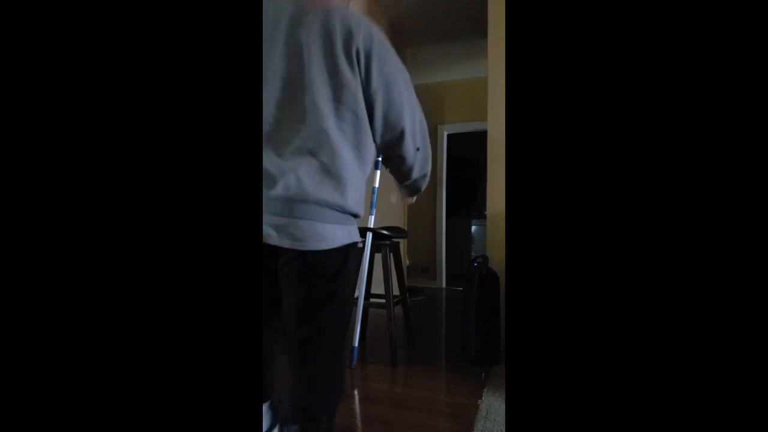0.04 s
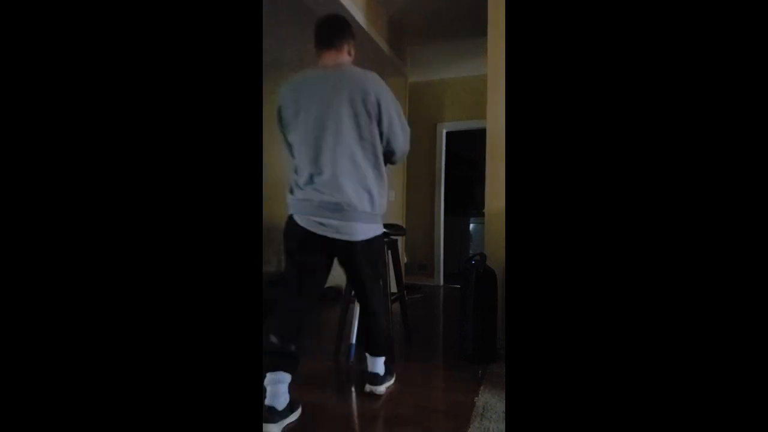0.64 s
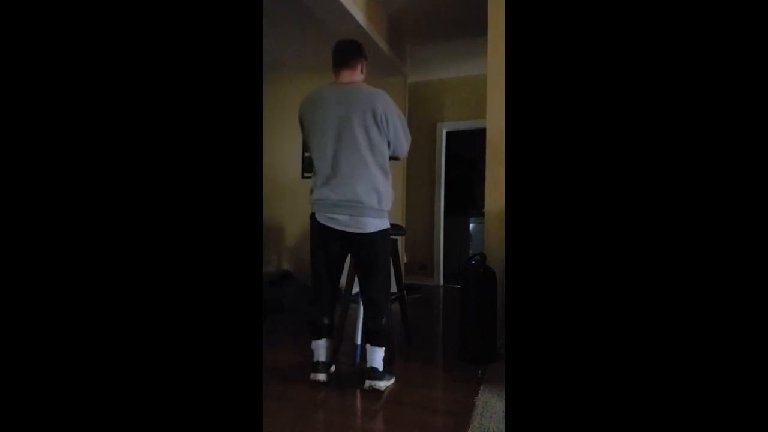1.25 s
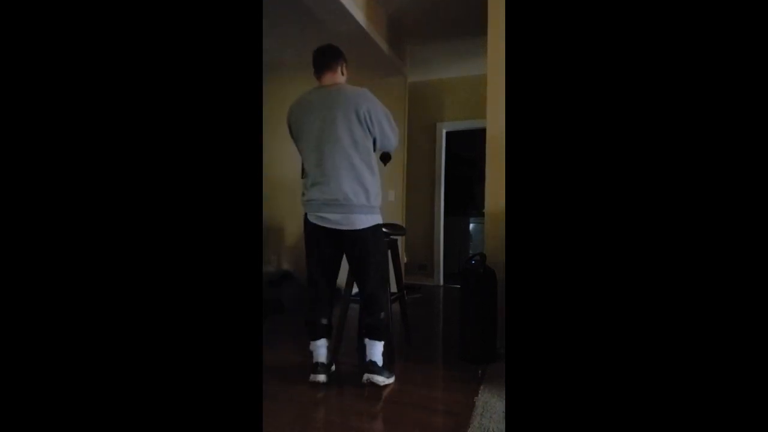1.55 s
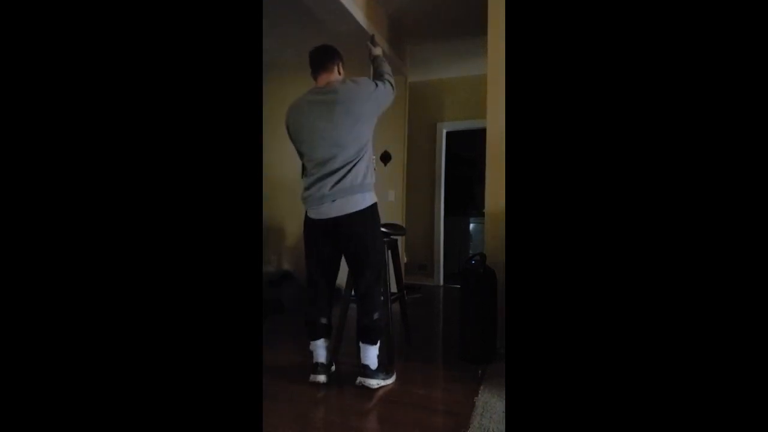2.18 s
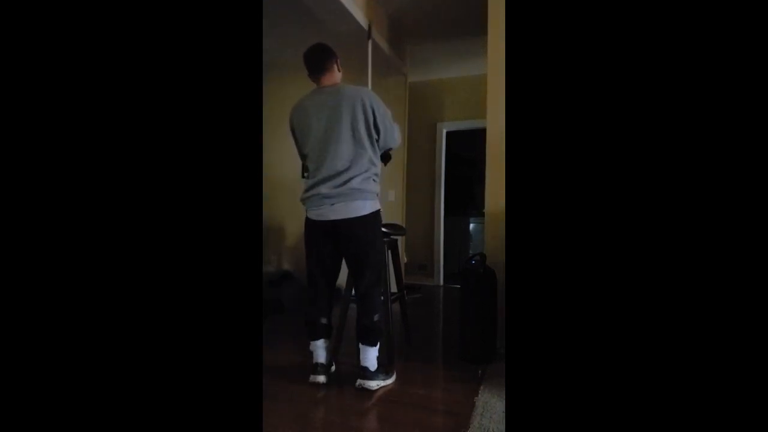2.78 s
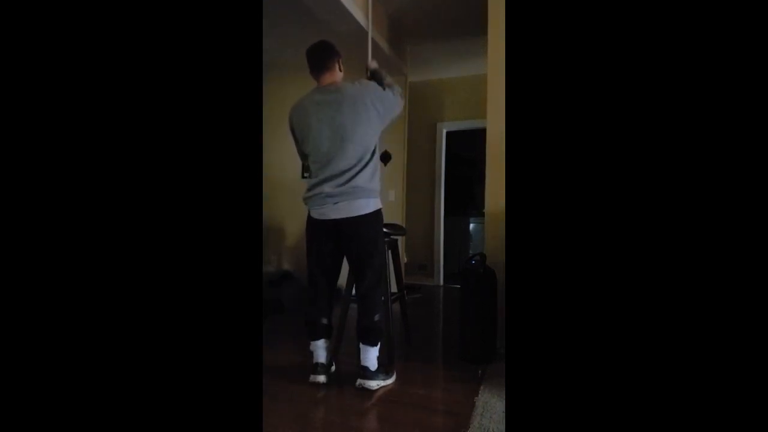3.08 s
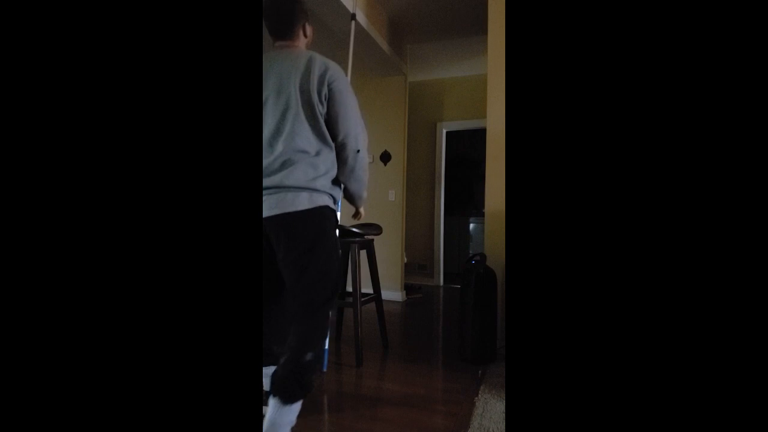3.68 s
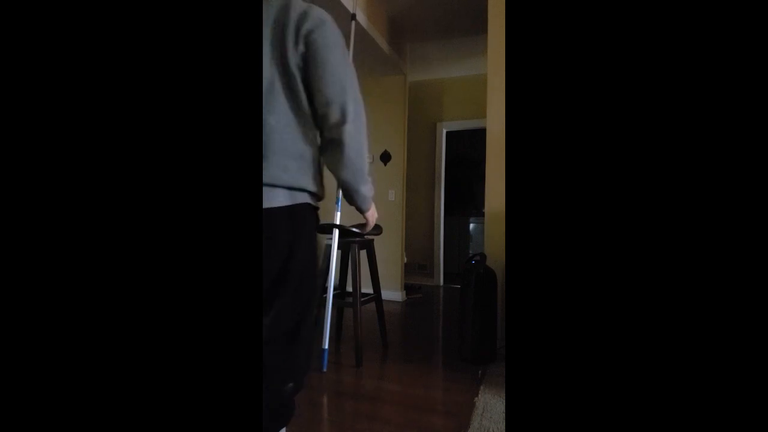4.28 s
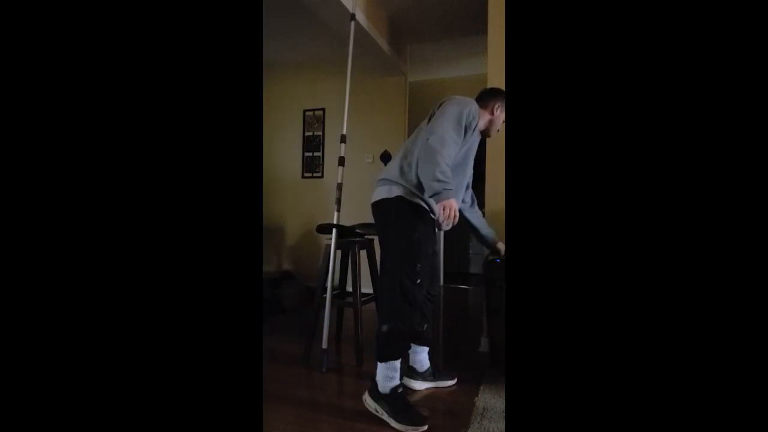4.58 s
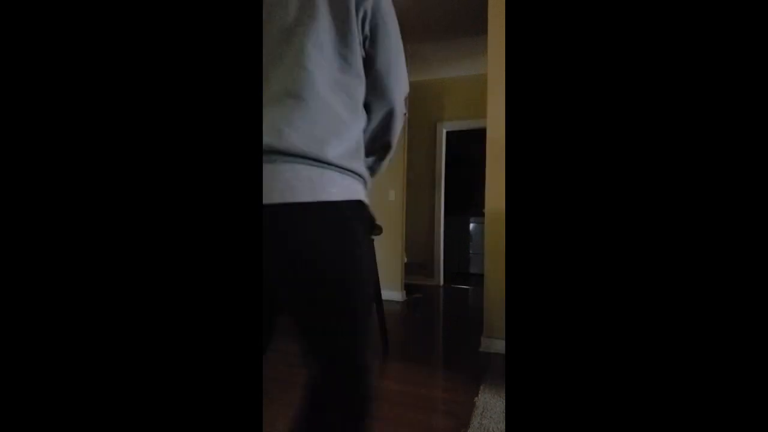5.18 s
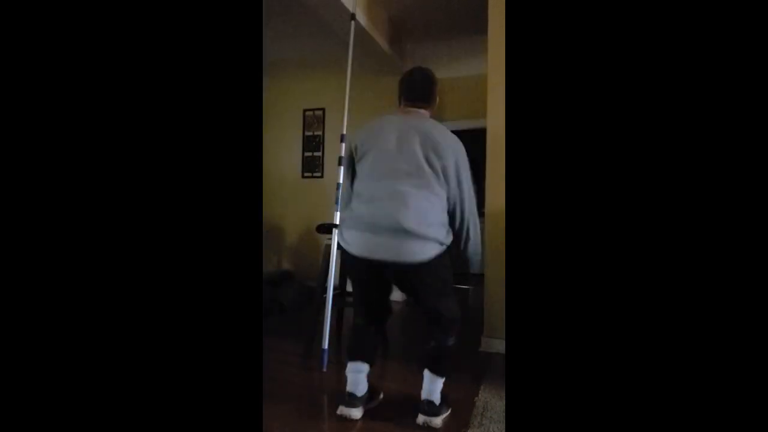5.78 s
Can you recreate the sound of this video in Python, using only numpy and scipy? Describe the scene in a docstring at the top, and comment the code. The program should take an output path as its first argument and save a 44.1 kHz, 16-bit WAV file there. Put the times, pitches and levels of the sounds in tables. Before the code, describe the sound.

Soft footsteps and rustling clothes lead into four wooden thumps as a metal pole is pushed into place against a stool, the last one weaker. The room resonates low after each blow, and the pole ticks, scrapes and squeaks faintly. Near the end, heavier steps thud and scuff on the floorboards as someone jumps. A microphone in the room picks up a low hum of air and a faint, thin hiss that comes and goes.

```python
"""Air hums in a quiet room; a thin high hiss comes and goes, clothes swish and soft steps thud
on the hardwood floor. A long metal pole is stood against a wooden stool and knocked home four
times: each blow thumps the wood and leaves the room ringing with low, lasting resonances. In
between the pole ticks, squeaks and scrapes, tiny slips ringing the tube. Then steps, rustling
clothes and scuffing shoes build to a jump, while the rush of air swells a little."""
import sys
import numpy as np
from scipy import signal
from scipy.fft import rfft, irfft, next_fast_len
from scipy.io import wavfile
from scipy.ndimage import uniform_filter1d

SR = 44100
rng = np.random.default_rng(int(sys.argv[2]) if len(sys.argv) > 2 else 0)


def generate_wav(signal):
    """Clip the signal to [-1, 1] and save it as 16-bit WAV at the path in sys.argv[1]."""
    frames = np.transpose(np.atleast_2d(signal))
    scaled = np.clip(frames, -1, 1) * 32767
    pcm = np.round(scaled).astype(np.int16)
    wavfile.write(sys.argv[1], SR, pcm)


N = 266667
TIME = np.arange(N) / SR

# colour of the low rush of air: f/Hz, level/dB
AIR_COLOUR = [(25, -28), (60, -3), (120, -3.5), (200, -4), (260, -3.5), (380, 1.5), (600, -7.5), (830, -3),
              (1050, -8.5), (1400, -6), (1700, -16)]
# colour of its faint treble: f/Hz, level/dB
AIR_TREBLE = [(1700, 7), (1950, -18), (3000, -14.5), (5000, -27.5), (7400, -12), (8600, -27), (16000, -21)]
# the rush swells towards the end: t/s, level/dB
AIR_SWELL = [(0, -61), (4.3, -60.5), (5.2, -58.5), (6.05, -56.5)]
# narrow hums in the air: f/Hz, width/Hz, level/dB
AIR_HUMS = [(235.7, 2.7, -64), (311, 28, -83), (1349, 19, -73.5), (3896, 65, -88.5), (6780, 110, -85.5)]
# spans of thin high hiss: t/s, length/s, level/dB
HISS_SPANS = [(0, 0.41, -73), (1.65, .64, -72), (2.815, 0.56, -71), (3.545, 0.82, -83)]
# colour of that hiss: f/Hz, level/dB
HISS_COLOUR = [(1800, -5), (2600, -8), (4500, -3.5), (7600, -1), (8800, -8.5), (11000, -9.5), (12200, -2),
               (13500, -9), (16000, -19)]
# clothes swish as an arm or the body swings: peak t/s, level/dB, half length/s
CLOTH_SWISHES = [(0, -67, 0.072), (0.867, -66, 0.19), (1.487, -67.5, 0.21), (2.3, -63, 0.062),
                 (3.973, -67.5, 0.079), (4.443, -66.5, 0.062), (4.804, -80, 0.089), (5.545, -59.5, 0.24),
                 (5.998, -49.5, 0.18)]
# soles scuff the floor: t/s, level/dB, length/s
SOLE_SCUFFS = [(.19, -59.5, .21), (.71, -65, 0.19), (1.155, -55, 0.067), (2.825, -52.5, 0.14),
               (5.31, -45.5, 0.086), (5.645, -62, 0.074), (5.84, -36.5, 0.036)]
# colour of rubbing cloth and soles: f/Hz, level/dB
RUB_COLOUR = [(300, 22.5), (800, 8), (1500, 15), (2100, 2), (3000, 4), (5000, -1.5), (7500, 0),
              (9500, -7.5), (12500, -4), (16000, -8)]
# clacks of pole, shoes and loose boards: t/s, level/dB, f/Hz
CLACK_HITS = [(0.249, -57, 1380), (.757, -54, 830), (4.422, -53, 885), (4.767, -53, 1110),
              (5.594, -48, 1470), (5.631, -34, 1440), (5.803, -45.5, 1260), (5.833, -38, 592),
              (5.835, -41, 1310), (5.849, -43.5, 1590), (6.039, -35, 1500)]
# footfalls: t/s, heel level/dB, ball level/dB, heel-to-ball roll/s, heel brightness/Hz
FOOTFALLS = [(.29, -49, -42, .075, 179), (0.759, -43.5, -49, .075, 230), (1.138, -40.5, -41, .067, 200),
             (2.875, -27.5, -24.5, .045, 108), (3.071, -50, -41.5, .14, 105), (5.245, -47, -30, .068, 151),
             (5.40, -37, -54, .09, 111), (5.63, -32.5, -38, .04, 166), (5.835, -28, -17.5, .033, 156)]
# modes of the floorboards under a foot: f/Hz, level/dB, t60/s
BOARD_MODES = [(57.8, -7.5, 0.19), (80.2, -6, 0.18), (119.3, -2, 0.049), (191.4, -1, 0.051),
               (271, 0.5, 0.04), (600, -58, 0.0062)]
# small sharp ticks and, near 5.65 s, a clack's two bright echoes: t/s, level/dB, f/Hz
TICK_HITS = [(0.817, -51, 11000), (0.921, -49, 10800), (5.63, -38, 5000), (5.6498, -37, 9400),
             (5.6542, -30.5, 7640), (5.835, -39, 2780)]
# the pole catches on the seat, then scrapes along it: t/s, clack level/dB, scrape level/dB, length/s
SEAT_SCRAPES = [(1.373, -49, -55, 0.14), (2.22, -50, -49.5, 0.083), (2.737, -54, -60.5, 0.094),
                (2.829, -44.5, -52, 0.032)]
# modes of the sliding tube: f/Hz, level/dB, t60/s
TUBE_MODES = [(650, 3, 0.024), (745, 0, 0.016), (954, 11.5, 0.01), (1476, 9, 0.016), (1670, -15, 0.011),
              (2336, -2.5, 0.015), (2630, -12, 0.023), (4740, 3, 0.00065)]
# four firm knocks of the pole and a few faint bumps: t/s, level/dB, brightness/Hz
POLE_KNOCKS = [(1.4035, -7.5, 930), (1.6825, -4.5, 2180), (2.186, -10.5, 3060), (2.737, -39.5, 1500),
               (2.8645, -21, 890), (3.628, -40.5, 700), (3.665, -39, 486), (4.424, -39.5, 700)]
# modes of the damped wood under a knock: f/Hz, level/dB, t60/s
WOOD_MODES = [(157, -11.5, 0.023), (249, 4, 0.017), (496, -19, 0.022), (913, -13, 0.0068),
              (1310, -18, 0.016), (2500, -20, 0.0021), (5260, -29, 0.00067), (7920, -6, 0.0015)]
# lasting resonances of the room, set off by a knock: f/Hz, level/dB, t60/s
ROOM_MODES = [(62.1, -22.5, 1), (91.3, -23, 0.86), (108, -40, 0.38), (149.3, -36.5, 0.93), (179, -23, 0.41),
              (191, -22, 0.61), (200, -45, 0.78), (237.4, -16, 0.49), (252.7, -15.5, 0.37),
              (262.7, -17, 0.58), (293.2, -12.5, 0.29), (308.5, -14.5, 0.41), (330.8, -21.5, 0.66),
              (338, -39, 0.46), (408, -30, 0.63), (441.5, -38.5, 0.75), (529, -26, 0.4), (597, -31.5, 0.46),
              (770, -50, 0.46), (824, -38.5, 0.66), (926, -62, 1), (1244, -40, 0.14), (1460, -42, 0.33),
              (1500, -45, 0.99)]
# brief squeaks of the pole: peak t/s, level/dB, half length/s, f/Hz, waver/Hz
POLE_SQUEAKS = [(1.59, -54, .03, 668, 8), (2.355, -50.5, .055, 680, 14), (3.005, -64, .035, 10500, 350)]
# early reflections: delay/s, gain
REFLECTIONS = [(.0108, .4), (.0198, .65), (.0225, .4)]
# decay of the room's tail: f/Hz, t60/s
TAIL_DECAY = [(60, 1.0), (250, 0.68), (700, 0.55), (1500, 0.6), (3000, 0.56), (8000, 0.41), (16000, 0.31)]
# colour of that tail: f/Hz, level/dB
TAIL_COLOUR = [(60, -3), (150, -1.5), (280, -0.5), (600, 8), (1400, 4.5), (3000, 13.5), (8000, 8.5),
               (16000, 0)]
# how alike left and right are in diffuse sound: f/Hz, correlation
STEREO_LIKENESS = [(60, 0.86), (300, 0.98), (600, 0.81), (1000, -0.069), (1500, -0.069), (3000, 0.026),
                   (16000, -0.062)]
# mids and treble lean to the right microphone: f/Hz, left minus right level/dB
MIC_BALANCE = [(60, 1.7), (280, -0.2), (550, -6.5), (1000, -8), (1500, -14), (2300, -0.5), (4500, -6.5),
               (9000, -5.5), (16000, -2)]


def from_db(db):
    """Decibels to gain."""
    return 10 ** (np.asarray(db) / 20)


def unit_rms(x):
    """Scale to unit rms."""
    return x / np.sqrt(np.mean(x ** 2) + 1e-20)


def at_hz(points, hz):
    """Read a table on a log-frequency axis."""
    f, value = np.transpose(points)
    return np.interp(np.log(np.maximum(hz, 1)), np.log(f), value)


def cut(x, hz, kind, order=2):
    """Causal Butterworth filter."""
    sections = signal.butter(order, np.clip(hz, 10, .48 * SR), kind, fs=SR, output="sos")
    return signal.sosfilt(sections, x + 1e-18)


def add(track, s, sound):
    """Mix a short sound into a track at time s."""
    start = max(round(s * SR), 0)
    part = sound[:max(N - start, 0)]
    track[start:start + len(part)] += part


def ring(force, hz, t60):
    """One mode: a click sets a dying sine ringing."""
    radius, angle = from_db(-60 / (t60 * SR)), 2 * np.pi * hz / SR
    return signal.lfilter([0, np.sin(angle)], [1, -2 * radius * np.cos(angle), radius ** 2], force + 1e-18)


def body(force, modes):
    """A bank of modes driven by one force."""
    return sum(from_db(db) * ring(force, hz, t60) for hz, db, t60 in modes)


def blows(rows):
    """One force pulse per contact, rounded off to its brightness."""
    force = np.zeros(N)
    for s, db, hz in rows:
        add(force, s, from_db(db) * cut(signal.unit_impulse(SR // 10), hz, "low"))
    return force


def strokes(rows, attack_s):
    """Envelope of rubbing strokes that start quickly and run out."""
    gain = np.zeros(N)
    for s, db, length in rows:
        age = np.maximum(TIME - s, 0)
        gain += from_db(db) * (1 - np.exp(-age / attack_s)) * np.exp(-(age / length) ** 2)
    return gain


def flutter(samples):
    """Random wobble of unit rms, smoothed over so many samples."""
    return unit_rms(uniform_filter1d(rng.standard_normal(N), size=samples))


def spread(mid, side, hz):
    """Stereo from two noises: centred in the bass, wide in the treble."""
    alike = at_hz(STEREO_LIKENESS, hz)
    return np.sqrt(1 + alike) * mid + np.sqrt(1 - alike) * side * np.array([[1], [-1]])


def noise(gain_at):
    """Diffuse stereo noise with a given gain over frequency; its mid has rms 1."""
    size = next_fast_len(N)
    hz = np.arange(size // 2 + 1) * SR / size
    mid, side = rfft(rng.standard_normal((2, size)))
    stereo = irfft(spread(mid, side, hz) * gain_at(hz), size)[:, :N]
    return stereo / np.std(stereo.mean(axis=0))


def coloured(colour):
    """Noise shaped by a colour table, falling steeply outside it."""
    low, high = colour[0][0], colour[-1][0]
    return noise(lambda hz: from_db(at_hz(colour, hz))
                 / (1 + (low / (hz + 1)) ** 12) / (1 + (hz / high / 1.1) ** 30))


def hum(centre_hz, width_hz):
    """Noise in one narrow resonance."""
    return noise(lambda hz: 1 / (1 + ((hz - centre_hz) / width_hz) ** 2))


def air(treble_db=-74):
    """The bed: a low rush of air that swells late, with a faint treble and steady hums."""
    swell = from_db(np.interp(TIME, *np.transpose(AIR_SWELL)))
    rush = swell * coloured(AIR_COLOUR)
    treble = from_db(treble_db) * coloured(AIR_TREBLE)
    return rush + treble + sum(from_db(db) * hum(hz, width) for hz, width, db in AIR_HUMS)


def thin_hiss(attack_s=0.023, release_s=0.0082):
    """A thin high hiss comes in, holds and cuts off."""
    gain = np.zeros(N)
    for s, length, db in HISS_SPANS:
        age = np.maximum(TIME - s, 0)
        release = np.exp(-np.maximum(age - length, 0) / release_s)
        gain += from_db(db) * (1 - np.exp(-age / attack_s)) * release
    return gain * coloured(HISS_COLOUR)


def rubbing(grain_db=1.8, rest_db=-81.5):
    """Cloth and soles rub in small uneven grains; a swish swells and fades with its swing."""
    grain = from_db(grain_db * flutter(samples=120))
    scuffs = strokes(SOLE_SCUFFS, attack_s=.035)
    swishes = sum(from_db(db) * np.exp(-((TIME - s) / half) ** 2) for s, db, half in CLOTH_SWISHES)
    return (from_db(rest_db) + swishes + scuffs) * grain * coloured(RUB_COLOUR)


def clacks(crack_gain=0.99, catch_hz=870, decay_cycles=3.5):
    """Small contacts ring for a few cycles with a crack of noise; one starts each scrape."""
    out, t = np.zeros(N), TIME[:SR // 20]
    hits = CLACK_HITS + [(s, db, catch_hz) for s, db, _, _ in SEAT_SCRAPES]
    for s, db, hz in hits:
        tone = np.sin(2 * np.pi * hz * t)
        crack = crack_gain * cut(rng.standard_normal(len(t)), [hz / 2, hz * 1.55], "band")
        add(out, s, from_db(db) * np.exp(-t * hz / decay_cycles) * (tone + crack))
    return out


def steps(ball_brightness=0.52):
    """Soft soles roll from the heel to the duller ball of the foot, thudding on the floorboards."""
    heels = [(s, db, hz) for s, db, _, _, hz in FOOTFALLS]
    balls = [(s + roll, db, ball_brightness * hz) for s, _, db, roll, hz in FOOTFALLS]
    return cut(body(blows(heels + balls), BOARD_MODES), 61, "high")


def ticks(decay_s=.0008):
    """Sharp ticks and a clack's two bright echoes: pinpricks of noise, an octave wide."""
    out, t = np.zeros(N), TIME[:SR // 100]
    for s, db, hz in TICK_HITS:
        burst = rng.standard_normal(len(t)) * np.exp(-t / decay_s)
        add(out, s, from_db(db) * cut(burst, [hz / np.sqrt(2), hz * np.sqrt(2)], "band", order=1))
    return out


def scrapes(slips_per_s=1500):
    """Dense uneven slips ring the tube while it slides on the seat."""
    slips = (rng.random(N) < slips_per_s / SR) * rng.standard_normal(N)
    pressure = strokes([(s, db, length) for s, _, db, length in SEAT_SCRAPES], attack_s=0.0021)
    return pressure * cut(unit_rms(body(slips, TUBE_MODES)), 310, "high")


def knocks(thump_db=-3.0, ring_db=-4.5):
    """The pole thumps the wood and leaves the room's modes ringing. Returns thump and ring-out."""
    force = blows(POLE_KNOCKS)
    thump = -cut(body(force, WOOD_MODES), 80, "high", order=1)
    # neighbouring modes start in opposite directions, so the ring blooms just after the blow
    ring_out = body(force, ROOM_MODES[::2]) - body(force, ROOM_MODES[1::2])
    return from_db(thump_db) * cut(thump, 40, "high"), from_db(ring_db) * cut(ring_out, 78, "high")


def squeaks():
    """The pole sticks and slips, settling for a moment into a wavering tone."""
    out = np.zeros(N)
    for s, db, half, hz, waver in POLE_SQUEAKS:
        pitch = hz + waver * flutter(samples=80)
        envelope = from_db(db) * np.exp(-((TIME - s) / half) ** 4)
        out += envelope * np.sin(2 * np.pi * np.cumsum(pitch) / SR)
    return out


def room(dry, build_s=0.01, early_db=-7.0, early_s=0.015, left_lag_s=0.00019, shadow_hz=3200):
    """Direct sound dulled by the body in its way, bright echoes, then a tail dying band by band."""
    t = TIME[:SR * 5 // 4]
    white, response = rng.standard_normal((2, 2, len(t))), np.zeros((2, len(t)))
    response[0, round(left_lag_s * SR)] = 1
    response[1, 0] = 1
    response = cut(response, shadow_hz, "low")
    for delay, gain in REFLECTIONS:
        response[:, round(delay * SR)] += gain
    swell = (1 - np.exp(-(t / build_s) ** 2)) * (1 + from_db(early_db) * np.exp(-t / early_s))
    edges_hz = np.geomspace(35, 17000, 19)
    for k, (low, high) in enumerate(zip(edges_hz, edges_hz[1:])):
        hz = np.sqrt(low * high)
        envelope = swell * from_db(-60 * t / at_hz(TAIL_DECAY, hz))
        mid, side = (unit_rms(cut(w * envelope, [low, high], "band")) for w in white[k % 2])
        band_gain = from_db(at_hz(TAIL_COLOUR, hz)) * np.sqrt((high - low) / SR / len(t))
        response += band_gain * spread(mid, side, hz)
    return signal.fftconvolve(dry[None], response, axes=1)[:, :N]


def scene(clack_near_db=1.0, tick_near_db=2.5, tick_send_db=-6.5):
    """Thumps, scrapes, steps, clacks and ticks feed the reverb; the last two also play close and dry."""
    thump, ring_out = knocks()
    clack, tick = clacks(), ticks()
    room_send = thump + scrapes() + steps() + clack + from_db(tick_send_db) * tick
    near = from_db(clack_near_db) * clack + from_db(tick_near_db) * tick
    return room(room_send) + near + ring_out + squeaks() + rubbing() + air() + thin_hiss()


def record(dry, cutoff_hz=15900):
    """Two microphones of unequal colour tilt the image right; a steep low-pass trims the top."""
    size = next_fast_len(N + SR // 10)
    hz = np.arange(size // 2 + 1) * SR / size
    left_to_right = from_db(at_hz(MIC_BALANCE, hz))
    mic_gains = 2 * np.array([left_to_right, np.ones_like(hz)]) / (1 + left_to_right)
    heard = irfft(rfft(dry, size) * mic_gains, size)[:, :N]
    return signal.sosfilt(signal.ellip(10, .2, 70, cutoff_hz, fs=SR, output="sos"), heard)


dry = scene()
out = record(dry)
generate_wav(out)
```